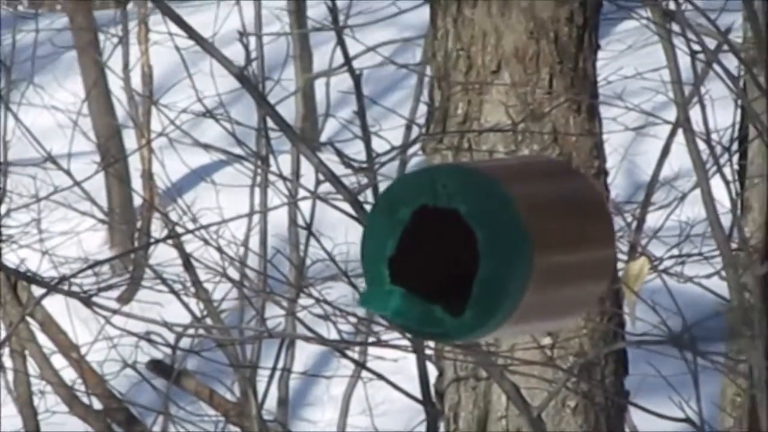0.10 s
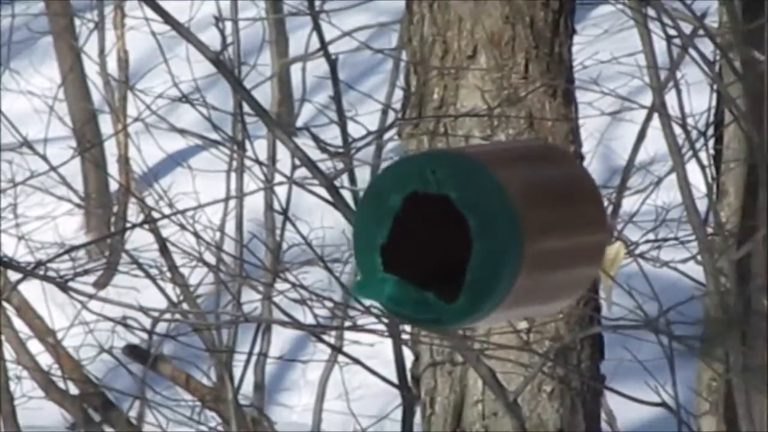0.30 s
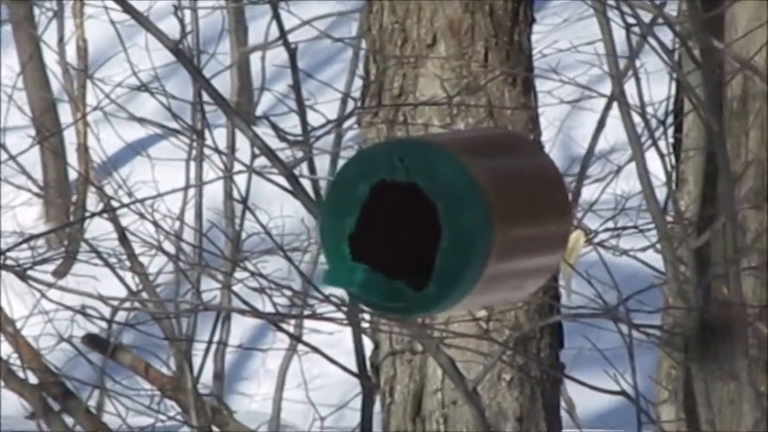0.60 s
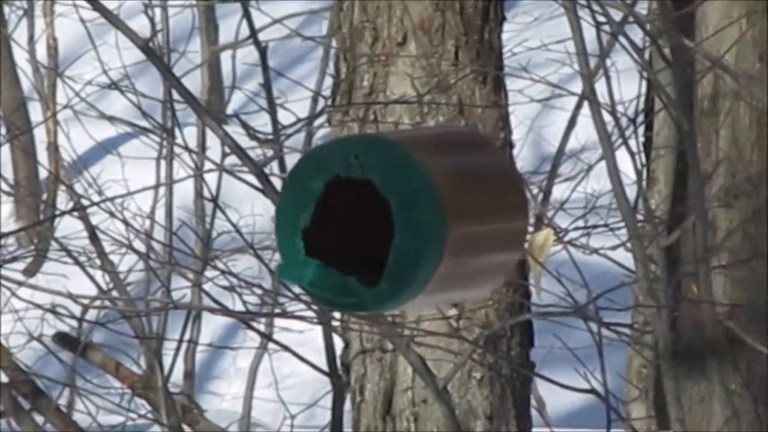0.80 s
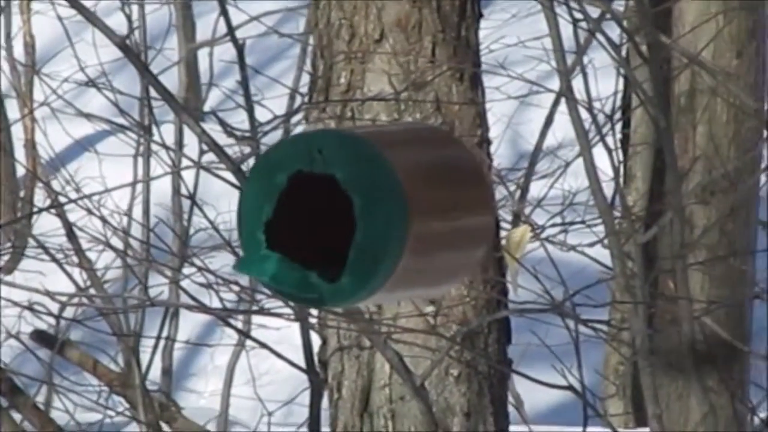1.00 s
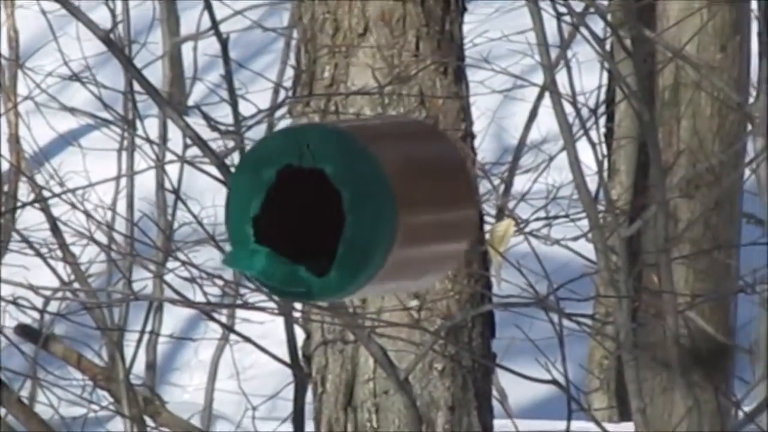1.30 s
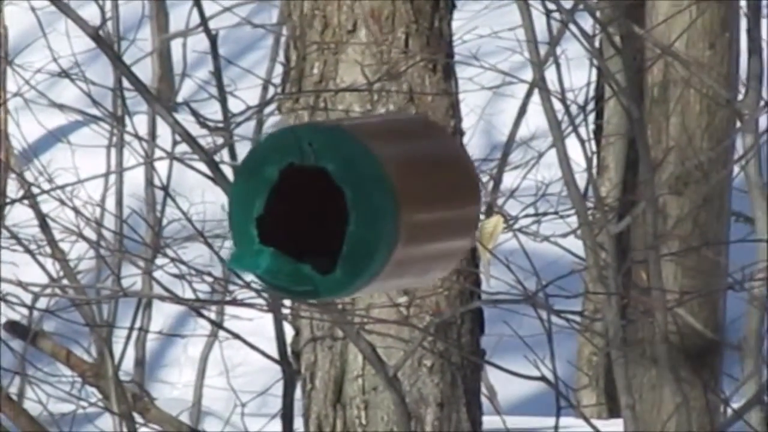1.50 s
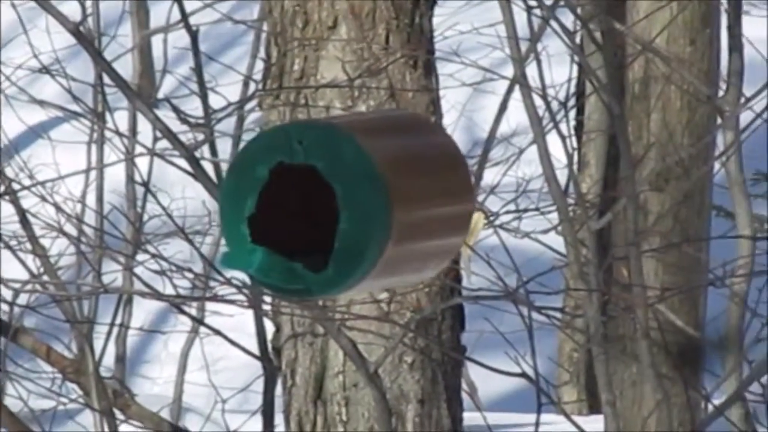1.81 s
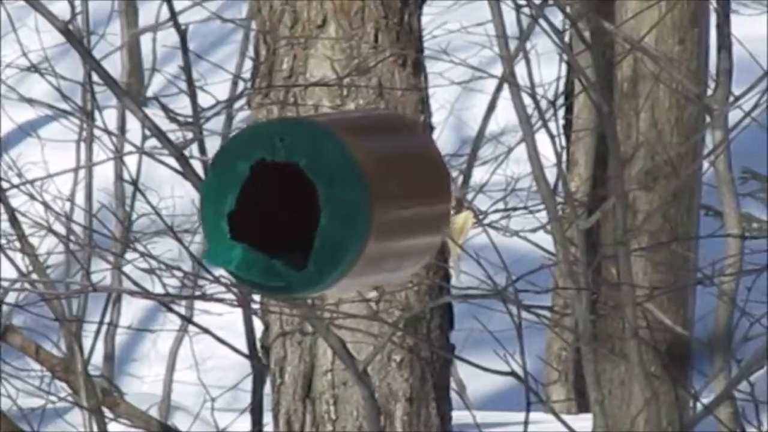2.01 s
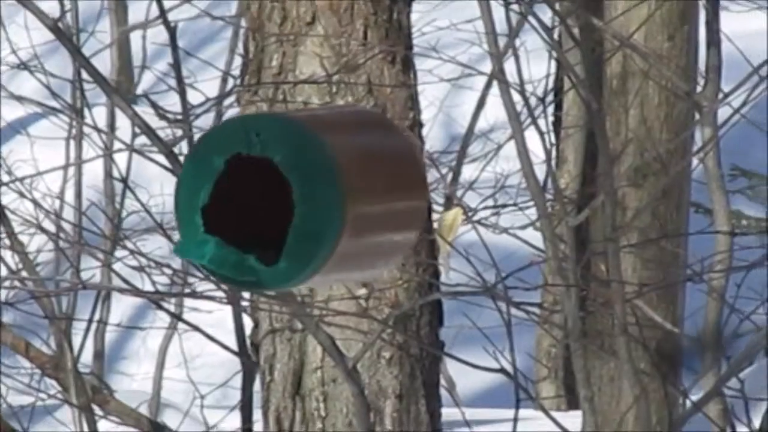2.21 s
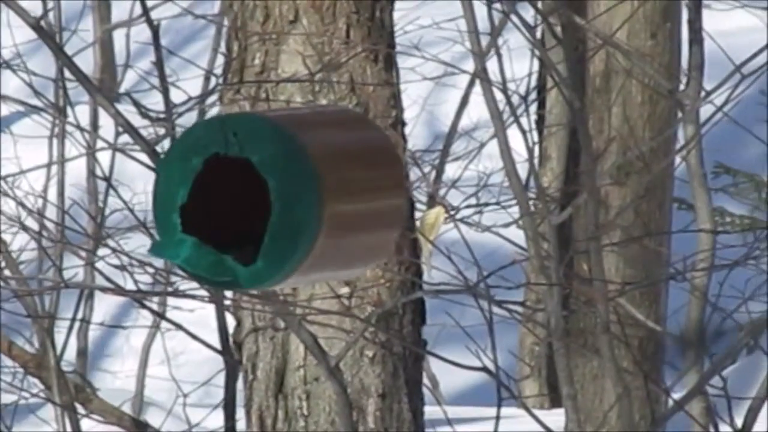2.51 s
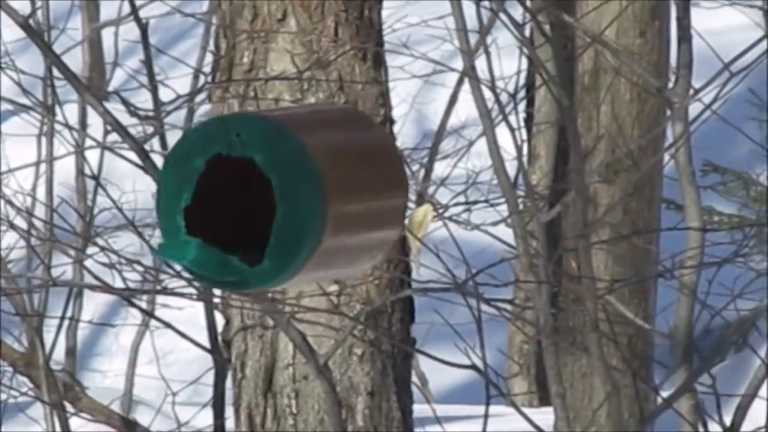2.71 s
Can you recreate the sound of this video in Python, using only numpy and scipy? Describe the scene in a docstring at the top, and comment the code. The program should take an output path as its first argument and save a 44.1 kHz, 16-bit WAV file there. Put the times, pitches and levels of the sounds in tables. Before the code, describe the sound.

Near the microphone, slightly right of centre, a small songbird buzzes eight bright, raspy notes in open winter woods, over nearly steady low-weighted hiss and wind-like rumble; a faint, hoarse chirp from further off comes last.

```python
"""Snowy woods: throughout, a nearly steady hiss lies over a low, wavering drone and a surging rumble.
A chickadee close by gives eight buzzy "dee" notes. The two sides of its syrinx beat against each
other, and the throat brings out the partials near 6 kHz; turbulence adds a rasp.
After each note the trunks scatter a short echo; last, a faint harsh note comes from further off."""
import sys
import numpy as np
from scipy import signal
from scipy.fft import rfft, irfft
from scipy.io import wavfile
from scipy.ndimage import uniform_filter1d, minimum_filter1d

SR = 44100
rng = np.random.default_rng(int(sys.argv[2]) if len(sys.argv) > 2 else 0)


def output_pcm(signal):
    """Save a mono or channel-first signal as 16-bit PCM at the path in sys.argv[1].

    Samples are clipped to [-1, 1] before scaling.
    """
    pcm = np.clip(np.atleast_2d(signal).T, -1, 1) * 32767
    wavfile.write(sys.argv[1], SR, np.round(pcm).astype(np.int16))


N = 127890  # samples, 2.9 s


def undb(db):
    """Level to amplitude: 20 dB is a factor of ten."""
    return 10 ** (np.asarray(db) / 20)


def unit(x):
    """Normalization to a root-mean-square of 1."""
    return x / np.sqrt(np.mean(x ** 2) + 1e-18)


def walk(rate_hz, size):
    """Low-passed noise: a smooth random drift with a spread of 1."""
    hz = np.fft.rfftfreq(size, 1 / SR)
    spectrum = rfft(rng.standard_normal(size)) / (1 + (hz / rate_hz) ** 4)
    return unit(irfft(spectrum, size))


def along(x, points):
    """Linear interpolation between the rows of a two-column table."""
    return np.interp(x, *np.array(points).T)


def curve_db(hz, points):
    """Spectral envelope: (frequency [Hz], level [dB]) points joined on a log-frequency axis."""
    f, db = np.array(points).T
    return np.interp(np.log(hz + 1), np.log(f), db)


def colour(x, gain_db):
    """Minimum-phase filtering: folding the cepstrum makes a causal filter from a gain in dB."""
    size = len(x)
    cepstrum = irfft(np.log(undb(gain_db(np.fft.rfftfreq(size, 1 / SR)))), size)
    cepstrum[1:size // 2] *= 2
    cepstrum[size // 2 + 1:] = 0
    return irfft(rfft(x) * np.exp(rfft(cepstrum)), size)


def narrow_noise(centre_hz, width_hz):
    """Band-limited noise: a soft resonance selects from a white spectrum."""
    hz = np.fft.rfftfreq(N, 1 / SR)
    resonance = 1 / (1 + ((hz - centre_hz) / width_hz) ** 2)
    return unit(irfft(rfft(rng.standard_normal(N)) * resonance, N))


RELEASE_S = .022


def envelope(t, length, attack):
    """Exponential build-up, hold and decay; the decay starts at the given length."""
    rise = 1 - np.exp(-np.maximum(t, 0) / attack)
    return rise * np.exp(-np.maximum(t - length, 0) / RELEASE_S)


def add(out, start, x):
    """Superposition: a sound joins the mix at its start time."""
    i = int(start * SR)
    out[i:i + len(x)] += x[:len(out) - i]


# colour of the background hiss: (frequency [Hz], relative level [dB])
HISS_COLOUR = [(20, -1.5), (45, -5.5), (100, -5), (220, -1), (380, -5.5), (650, -4.5), (1000, -11),
               (1500, -18.5), (2500, -25.5), (4000, -28), (7000, -31), (10000, -39.5), (15000, -40)]
HISS_DB, HISS_WIDTH = -46, 0.016  # width: share of the left-right difference


def hiss():
    """Broadband noise: two coloured noises as sum and difference, nearly the same in both ears."""
    mid, side = (unit(colour(rng.standard_normal(N), lambda f: curve_db(f, HISS_COLOUR)))
                 for _ in range(2))
    stereo = mid + HISS_WIDTH * side * np.array([[1], [-1]])
    return undb(HISS_DB + .5 * walk(12, N)) * stereo


WAVER_DB = 3.5
# resonances of the low drone: (centre [Hz], width [Hz], level [dB])
DRONE_BANDS = [(163, 21, -51.5), (342, 18, -63)]
# brief swells of the drone: (time [s], rise [dB])
DRONE_SWELLS = [(1.0, 12.5), (1.119, 10), (1.401, 11), (2.25, 9.5), (2.53, 8)]
DRONE_SWELL_S = .035


def drone(t):
    """Resonance of noise: narrow low bands share a random waver and brief swells."""
    swell_db = sum(db * np.exp(-((t - at) / DRONE_SWELL_S) ** 2) for at, db in DRONE_SWELLS)
    bands = sum(undb(db) * narrow_noise(hz, width) for hz, width, db in DRONE_BANDS)
    return undb(swell_db + WAVER_DB / 2 * walk(20, N)) * bands


# surges of the rumble: (time [s], level [dB])
RUMBLE_SURGES = [(0, -19), (.43, 10), (.6, -6.5), (.8, 7), (1.0, 4), (1.2, 0), (1.4, 15), (1.7, -10),
                 (2.15, -1.5), (2.4, 9), (2.62, 8.5), (2.9, -1.5)]
RUMBLE_HZ, RUMBLE_WIDTH_HZ, RUMBLE_DB = 80.4, 33, -59


def rumble(t):
    """Amplitude modulation: one low noise band surges and wavers."""
    surge_db = along(t, RUMBLE_SURGES) + WAVER_DB * walk(3.4, N)
    return undb(RUMBLE_DB + surge_db) * narrow_noise(RUMBLE_HZ, RUMBLE_WIDTH_HZ)


# one brief swell in the hiss: (time [s], length [s], centre [Hz], width [Hz], level [dB])
HISS_SWELL = (1.95, .035, 600, 200, -54)


def hiss_swell(t):
    """Gaussian pulse: a band of noise rises and falls once."""
    at, length, hz, width, db = HISS_SWELL
    return undb(db) * np.exp(-((t - at) / length) ** 2) * narrow_noise(hz, width)


# slow level of hiss and drone together: (time [s], level [dB])
SLOW_LEVEL = [(0, -4), (.3, -1.5), (1.001, -3), (2.0, -1), (2.9, -1)]


def background():
    """Superposition of independent noises: hiss and drone share a slow change of level."""
    t = np.arange(N) / SR
    steady = (hiss() + drone(t)) * undb(along(t, SLOW_LEVEL))
    return steady + rumble(t) + hiss_swell(t)


WOODS_REACH_S, WOODS_BUILD_S = .06, 0.0027
WOODS_DB, WOODS_WIDTH = -7.5, .42


def woods(x):
    """Multiple scattering: direct sound plus a short, dense train of echoes from the trunks."""
    t = np.arange(SR // 2) / SR
    fade = (1 - np.exp(-t / WOODS_BUILD_S)) * np.exp(-(t / WOODS_REACH_S) ** 2)
    mid, side = rng.standard_normal((2, len(t))) * fade / np.linalg.norm(fade)
    # the ears differ only in the treble
    side = signal.sosfilt(signal.butter(2, 3500, 'high', fs=SR, output='sos'), side)
    echoes = np.array([mid + WOODS_WIDTH * side, mid - WOODS_WIDTH * side])
    return x + undb(WOODS_DB) * signal.fftconvolve(x, echoes, axes=1)[:, :N]


RASP_ATTACK_S = .012
# the faint harsh note: (start [s], length before release [s], level [dB])
FAR_NOTE = (2.792, 0.036, -41.5)
# its colour: (frequency [Hz], relative level [dB])
FAR_COLOUR = [(1200, -38), (1900, -5), (2600, -28), (3600, -7), (4400, 8.5), (5600, -8), (6600, 2),
              (7800, -32), (8800, -19), (9350, -6), (10200, -36.5), (15000, -35)]


def far_bird():
    """Source-filter principle: coloured noise makes one short, hoarse note."""
    start, length, db = FAR_NOTE
    voice = unit(colour(rng.standard_normal(N), lambda f: curve_db(f, FAR_COLOUR)))
    return undb(db) * voice * envelope(np.arange(N) / SR - start, length, RASP_ATTACK_S)


# throat gain for the tone: (frequency [Hz], gain [dB])
THROAT = [(900, -59), (1350, -33), (1600, -29.5), (1950, -41.5), (2200, -40.5), (2450, -27), (2750, -24.5),
          (3150, -21), (3650, -15.5), (3950, -24.5), (4500, -19.5), (5200, -10), (5600, -2), (5880, 3.5),
          (6300, -1.5), (7100, -16), (8000, -26.5), (9800, -25.5), (11600, -42.5), (15000, -63.5)]
# throat gain for the rasp: (frequency [Hz], gain [dB])
RASP_THROAT = [(900, -113), (1600, -10), (2100, -45), (2550, -10), (3300, -5), (4100, -8), (5000, 4),
               (5800, -8), (6500, 7), (7200, 10), (8000, -12.5), (10000, -22.5), (11800, -36), (15000, -65)]
THROAT_EXTRA_HZ, THROAT_EXTRA_WIDTH_HZ, TREBLE_HZ = 4580, 277, 6610


def throat_db(f, shape, throat_size, extra_db, treble_db):
    """Formant filtering: scaled resonances, one extra resonance and a treble shelf, in dB."""
    extra = extra_db * np.exp(-((f - THROAT_EXTRA_HZ) / THROAT_EXTRA_WIDTH_HZ) ** 2 / 2)
    treble = treble_db * (1 + np.tanh((f - TREBLE_HZ) / 400)) / 2
    return curve_db(f / throat_size, shape) + extra + treble


# partials that stand out or fall back: (multiple of the beat frequency, level [dB])
PARTIALS = [(5, 2.5), (6, 5.5), (7, -14), (8, -9.5), (9, 6), (10, 8), (11, 3), (12, 2.5), (13, -2.5),
            (14, 4.5), (15, 2.5), (16, 2.5), (17, -1), (18, 2.5), (19, 1.5), (20, -3)]
# frequencies of the two syrinx sides: (lower side, higher side) as multiples of the beat
SIDE_RATIOS = (5, 6)
SCOOP, SCOOP_S = .19, .052  # share by which a note starts flat, time constant of the slide up
JITTER, WOBBLE, FLUTTER_DB = .004, .003, 3.3  # spread: each side's pitch, shared pitch, partial level
LOW_ENTRY_S, LOW_ENTRY_DB = .04, -18
# weaker, less steady lines halfway between the partials
BETWEEN_DB, BETWEEN_JITTER = -10, .005
# the main throat resonance builds up as the note starts
PEAK_HZ, PEAK_WIDTH_HZ, PEAK_ENTRY_DB, PEAK_ENTRY_S = 5630, 420, -2, 0.045


def syrinx(t, beat_hz, throat):
    """Intermodulation: two unsteady voices mix into sum and difference tones, heard via the throat."""
    size = len(t)
    slide = 1 - SCOOP * np.exp(-t / SCOOP_S)
    hz = beat_hz * slide * (1 + WOBBLE * walk(41.3, size))
    low, high = SIDE_RATIOS
    low_turns, high_turns = (np.cumsum(r * hz * (1 + JITTER * walk(191, size))) / SR
                             for r in SIDE_RATIOS)

    def partial(turns, f, db):
        """Additive synthesis: one fluttering sine at the throat's gain for its gliding frequency."""
        build_db = PEAK_ENTRY_DB * np.exp(-t / PEAK_ENTRY_S - ((f - PEAK_HZ) / PEAK_WIDTH_HZ) ** 2 / 2)
        level_db = db + build_db + throat_db(f, THROAT, *throat) + FLUTTER_DB * walk(92, size)
        return undb(level_db) * np.sin(2 * np.pi * (turns + rng.random()))

    tone = np.zeros(size)
    for k in range(5, 38):
        # whole multiples of the two sides, some negative, that add up to k beats
        n_high = k % low
        n_low = (k - n_high * high) // low
        turns = n_high * high_turns + n_low * low_turns
        # the two fundamentals, and the lines just above them, enter late
        entry_db = LOW_ENTRY_DB * np.exp(-t / LOW_ENTRY_S) * (k <= high)
        tone += partial(turns, k * hz, along(k, PARTIALS) + entry_db)

        between_hz = (k + .5) * hz
        between_turns = np.cumsum(between_hz * (1 + BETWEEN_JITTER * walk(80, size))) / SR
        tone += partial(between_turns, between_hz, BETWEEN_DB + entry_db)
    return unit(tone)


ATTACK_S, SWELL_DB = .012, 4
RASP_DB, RASP_FADE_DB = -12, -8
SIZZLE_HZ, SIZZLE_WIDTH_HZ, SIZZLE_DB = 13800, 990, -53


def dee(length, beat_hz, throat_size, extra_db, treble_db, rasp_db):
    """Source-filter principle: syrinx tone and turbulent rasp pass the throat; a faint sizzle joins."""
    size = 12288  # samples, room for the release
    t = np.arange(size) / SR
    throat = throat_size, extra_db, treble_db
    effort = 1 - np.exp(-t / 0.058)

    tone = syrinx(t, beat_hz, throat)
    tone = tone * envelope(t, length, ATTACK_S) * undb(SWELL_DB * (effort - 0.5))

    # the faint top edge grows with effort
    sizzle = undb(SIZZLE_DB) * narrow_noise(SIZZLE_HZ, SIZZLE_WIDTH_HZ)[:size]
    sizzle = sizzle * effort * envelope(t, length - RELEASE_S, ATTACK_S)

    # the rasp fades as effort grows
    rasp = unit(colour(rng.standard_normal(size), lambda f: throat_db(f, RASP_THROAT, *throat)))
    rasp_level = undb(RASP_DB + rasp_db + RASP_FADE_DB * effort)
    return tone + sizzle + rasp * envelope(t, length, RASP_ATTACK_S) * rasp_level


# the dee notes: (start [s], length before release [s], beat after the slide [Hz], level [dB],
# throat size [factor], 4.6 kHz resonance [dB], treble [dB], rasp [dB], left minus right [dB])
DEES = [(0.19, 0.16, 311.8, -15.5, 0.97, 0, -5, 7.5, -0.5), (.467, 0.17, 317, -14, .98, -4, -5, 4, -0.9),
        (.759, 0.16, 319.7, -13.5, 0.98, -6.5, -4.5, 3, -1.1),
        (1.101, 0.16, 329, -12.5, 0.984, -2.5, -6, 1.5, -1),
        (1.384, 0.14, 332, -13.5, 1, -14, -3.5, 6, -0.5),
        (1.695, 0.15, 333.8, -13, 1.01, -5, -3.5, 2.5, -.8),
        (2.015, 0.16, 335.5, -13, 1.005, -5.5, -3, -3, 0.1),
        (2.447, 0.13, 313.6, -14.5, 1.027, 10.5, -12, 2.5, -0.6)]


def chickadee():
    """Interaural level difference: the run of dee notes sits mostly slightly right of centre."""
    out = np.zeros((2, N))
    for start, length, beat_hz, db, *throat_and_rasp, pan_db in DEES:
        note = undb(db) * dee(length, beat_hz, *throat_and_rasp)
        add(out[0], start, note * undb(pan_db / 2))
        add(out[1], start, note * undb(-pan_db / 2))
    return out


def scene():
    """Linear superposition: both birds sound through the woods, over the background."""
    birds = chickadee() + far_bird()
    return background() + woods(birds)


LIMIT, LIMIT_S = .76, .006  # peak amplitude (full scale = 1), smoothing time
TOP_HZ = 15300


def record(dry):
    """Gain control and low-pass: a fast limiter holds the loudest peaks, the recorder cuts the top."""
    size = int(LIMIT_S * SR)
    gain = np.minimum(1, LIMIT / (np.abs(dry).max(axis=0) + 1e-9))
    smooth_gain = uniform_filter1d(minimum_filter1d(gain, 2 * size), size)
    low_pass = signal.ellip(10, .1, 90, TOP_HZ, fs=SR, output="sos")
    return signal.sosfilt(low_pass, dry * smooth_gain)


dry = scene()
out = record(dry)
output_pcm(out)
```